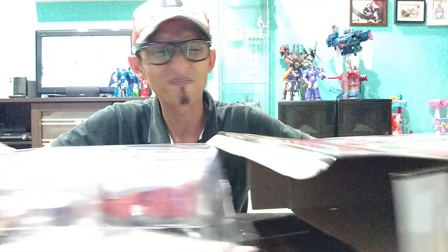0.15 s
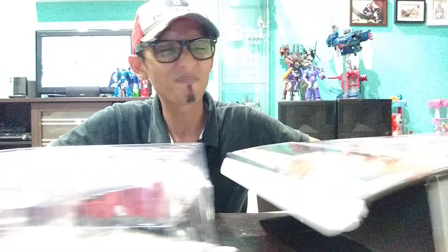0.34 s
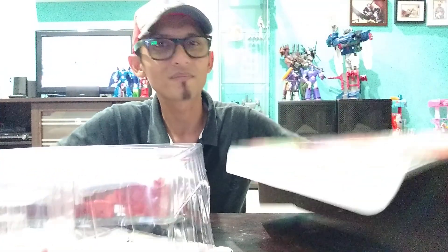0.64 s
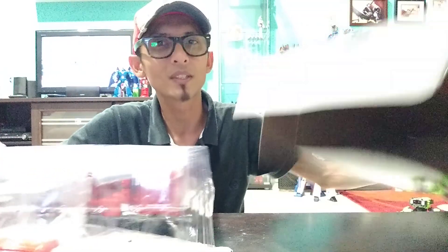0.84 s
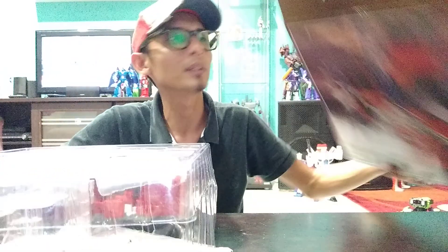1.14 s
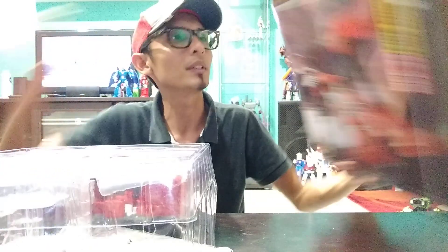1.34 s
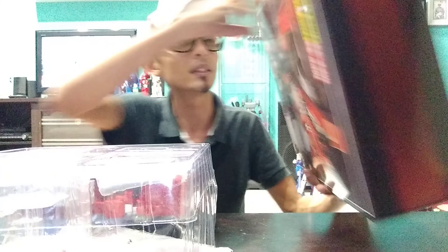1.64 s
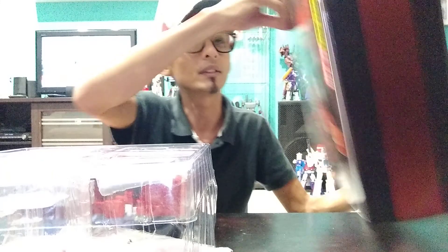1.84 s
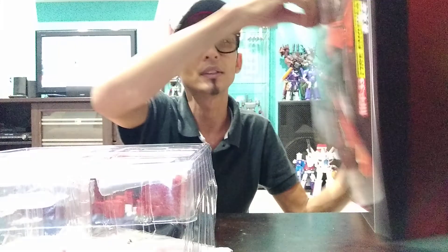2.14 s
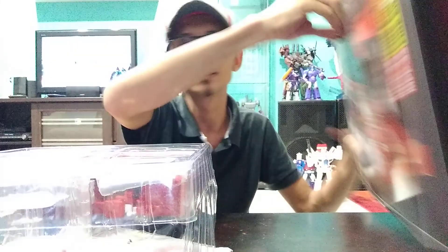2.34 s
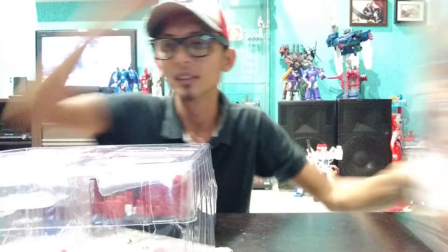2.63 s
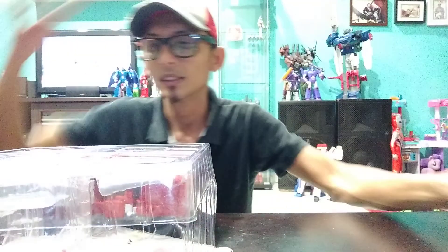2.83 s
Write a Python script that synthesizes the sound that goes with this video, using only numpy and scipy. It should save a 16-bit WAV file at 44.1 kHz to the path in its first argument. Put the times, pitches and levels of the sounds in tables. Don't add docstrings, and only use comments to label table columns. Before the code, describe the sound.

An empty cardboard box rubs off a plastic tray for the first 0.7 seconds, with creaks, hollow knocks, panel pops and flap scuffs. Handling bursts again around 0.9-1.3 seconds, then quieter pats at 1.75 and 1.9 and soft table bumps near 2.2. At 2.6 the box lands with the loudest, deep woody thud, followed by dragging. Close stereo, small room, faint hum.

```python
import sys
import numpy as np
from scipy import signal
from scipy.fft import rfft, irfft
from scipy.io import wavfile
from scipy.ndimage import uniform_filter1d

SR = 44100
rng = np.random.default_rng(int(sys.argv[2]) if len(sys.argv) > 2 else 0)


def digitize_waveform(pressure):
    field = np.atleast_2d(pressure).T
    bounded = np.clip(field, -1, 1)
    quanta = np.round(bounded * 32767).astype(np.int16)
    wavfile.write(sys.argv[1], SR, quanta)


def volts(x):
    e = np.asarray(x, float) / 20
    return 10 ** e


N = 132300

# time_s, level_db
TRAY_SLIDE = [
    (0, -65.5),
    (.3, -59),
    (.52, -67.5),
    (.56, -73),
    (.66, -65.5),
]
# pitch_hz, width_hz, level_db
TRAY_TONES = [(1100, 255, -1), (1579, 50, 2.5), (2065, 177, -0.5), (3890, 250, -9), (5340, 500, -33)]
# time_s, level_db
HAND_EFFORT = [(0, -50.5), (.7, -55.5), (.95, -57), (1.105, -89), (1.13, -37), (1.25, -53.5), (1.4, -65.5),
               (1.62, -67), (2.1, -61.5), (2.58, -57.5), (3.0, -54)]
# start_s, peak_db, pitch_hz, decay_to_60_db_s
PANEL_POPS = [(.036, -49, 1538, 0.065), (.185, -50, 1600, .06), (.211, -28.5, 1594, 0.049),
              (.363, -40, 1630, 0.045), (.379, -31, 1352, 0.039), (.478, -41, 2035, 0.13),
              (.495, -39, 1614, 0.071), (.531, -44, 1662, 0.075), (.541, -43, 2045, 0.054),
              (.604, -39.5, 908, 0.044), (.664, -51, 2480, .06), (.895, -40.5, 261, 0.12),
              (.94, -35, 2230, 0.046), (.941, -29, 349, 0.059), (.975, -46, 1310, .08),
              (1.113, -42.5, 1497, 0.081), (1.157, -44, 1880, .04), (1.213, -37, 2220, .04),
              (1.219, -44, 1530, 0.037), (1.25, -32, 206, 0.026), (1.274, -45, 340, 0.052),
              (1.298, -42, 299, .07), (1.325, -48.5, 1300, 0.17), (1.347, -41, 430, 0.099),
              (1.643, -46, 3700, .08), (1.652, -42.5, 3400, 0.084), (1.751, -27, 331, 0.092),
              (1.93, -39, 520, 0.071), (2.217, -49.5, 1055, 0.13), (2.219, -45.5, 465, 0.052),
              (2.291, -46, 520, 0.11), (2.428, -46.5, 2292, 0.046), (2.606, -18, 369, 0.16),
              (2.607, -23, 483, 0.13), (2.609, -28.5, 750, 0.12), (2.653, -22, 327.6, 0.082),
              (2.705, -42, 377, 0.09), (2.772, -44.5, 340, 0.085), (2.836, -39.5, 397, 0.094),
              (2.838, -41.5, 901, 0.085)]
# start_s, length_s, level_db, tilt_db_per_octave, lowest_hz
SCUFFS = [(.195, 0.035, -39.5, 5.5, 970), (0.355, 0.021, -46, 0.7, 1450), (0.405, 0.016, -49.5, 5, 1200),
          (0.474, 0.033, -45, 0.5, 920), (0.519, 0.038, -44.5, 2.5, 1010), (0.621, 0.021, -41.5, 9, 2370),
          (0.697, 0.024, -45, 4.5, 2000), (0.722, 0.045, -62.5, -4, 8800), (0.826, 0.057, -55, 9.5, 2530),
          (0.867, 0.043, -57.5, 2.5, 2300), (0.932, 0.03, -34.5, -2, 577), (0.954, 0.02, -47, 1.5, 600),
          (1.022, 0.021, -52.5, -0.5, 3540), (1.101, 0.054, -41, 3.5, 1100), (1.13, 0.1, -38, 0.5, 500),
          (1.206, 0.037, -38.5, -3, 504), (1.315, 0.062, -64.5, -10, 1100), (1.636, 0.058, -51, 0, 3300),
          (1.641, 0.045, -57, -1, 11000), (1.746, 0.034, -61.5, 3.2, 9000),
          (2.191, 0.074, -50.5, 3.1, 3530), (2.206, 0.058, -52, 3, 1920), (2.418, 0.033, -58, 3, 1940),
          (2.424, 0.017, -57.5, 15, 10900), (2.468, 0.065, -61.5, 5, 9000),
          (2.596, 0.036, -42.5, -1.5, 700)]
# pitch_hz, level_db
CARD_COLOUR = [(410, 14), (700, -2.5), (1570, -4.5), (3130, -20.5), (4160, -15), (4740, -19.5), (6480, -20),
               (8860, -35.5), (15700, -26)]
# start_s, peak_db, loudest_pitch_hz, slap_db (against the peak), upper_reach_octaves
KNOCKS = [(.206, -36.5, 454, 0.5, 1.2), (0.224, -33, 300, -10, 0.47), (0.38, -22, 576, -24, 0.97),
          (0.391, -23, 226, -43, 0.51), (0.474, -27.5, 500, -24, 0.67), (.600, -31.5, 530, -11, 4),
          (0.662, -32, 215, -12.5, 0.72), (.937, -26.5, 616, 8.5, 8.1), (1.056, -35, 430, -24, 0.17),
          (1.12, -29, 250, -6, 0.28), (1.149, -20.5, 250, -10.5, 1.5), (1.186, -27.5, 300, 2.5, 2.5),
          (1.228, -32, 616, 0.5, 0.54)]
PATS = [
    (1.670, -41.5, 300, -28, 0.45),
    (1.747, -23.5, 417, -20, 0.48),
    (1.887, -27, 455, -18.5, 0.37),
    (1.961, -39.5, 503, -17, 0.49),
    (2.001, -42.5, 610, -8, 1.2),
    (2.429, -40.5, 500, -17.5, 1.1),
    (2.472, -34.5, 460, -14, 0.19),
    (2.494, -33.5, 494, -14, 0.19),
    (2.602, -16, 292, -20.5, 0.73),
    (2.841, -42, 860, 5, 1.7),
]
# pitch_hz, level_db
WALL_TONES = [(172, -6.5), (215, -1.6), (250, -2.5), (300, 0.6), (345, -2), (375, -3.5), (435, -3),
              (500, 0.8), (590, 0), (720, 1.5), (830, -15.5), (960, -5.5), (1250, 6), (1600, -25)]
# start_s, peak_db, pitch_hz, ring_length_share
THUDS = [(0.334, -35.5, 158, 0.9), (0.379, -27, 101, 1), (0.612, -38.5, 151, 0.95),
         (0.86, -45.5, 175, 0.59), (1.082, -38.5, 153, 0.46), (1.11, -27.5, 120, 0.25),
         (1.187, -31, 116.6, 0.67), (1.766, -26.5, 174.8, 0.44), (1.882, -34, 119, 0.82),
         (1.968, -34.5, 193, 0.36), (1.991, -35, 124.6, 0.45), (2.131, -46, 104, 1),
         (2.213, -23.5, 106.9, 0.69), (2.249, -24, 109.5, 0.41), (2.427, -33.5, 149, 0.58),
         (2.486, -29, 134, 0.16), (2.598, -3, 136.6, 0.32), (2.621, -18, 118, 0.19),
         (2.646, -12, 146.2, 0.35), (2.688, -16.5, 133, 0.37), (2.739, -24, 125.4, 0.3),
         (2.779, -30.5, 163, 0.27), (2.824, -35.5, 110, .5), (2.293, -33, 121.8, 0.42),
         (2.341, -34, 106, 0.38), (2.924, -38, 98, 0.19)]
# pitch_ratio, level_db, decay_to_60_db_s, port_phase_rad
TABLE_TONES = [(.93, -1, 0.34, 0.78), (1.08, 0, 0.47, 0.3), (0.96, -5, 0.22, 0.61)]
# time_s, level_db
TABLE_DRAG = [
    (2.63, -63),
    (2.7, -49.5),
    (2.77, -46),
    (2.88, -49.5),
    (3.0, -51),
]
# pitch_hz, level_db
DRAG_COLOUR = [(710, -47.5), (1200, -16), (2010, -11.5), (2750, 0), (6930, -5), (8500, -15), (13900, -2.5),
               (15700, -0.5)]
# pitch_hz, level_db
HUM_COLOUR = [(24, -47), (40, -6.5), (198, -2), (625, -16.5), (865, -22), (1880, -19.5), (8200, -35.5),
              (15700, -31)]
# pitch_hz, level_db
PORT_TREBLE = [(20, 1), (4000, -2), (16500, 3.5)]

KNOCK_PAN_DB = -0.6


def table(rows):
    return np.array(rows, float).T


def unit(x):
    return x / np.sqrt(np.mean(x ** 2) + 1e-30)


def curve(rows):
    s, db = table(rows)
    return volts(np.interp(np.arange(N) / SR, s, db, left=-120, right=-120))


def colour(x, points, tilt_db=0.):
    n = x.shape[-1]
    hz, db = table(points)
    f = np.maximum(np.arange(n // 2 + 1) * SR / n, 1.)
    gain_db = np.interp(np.log(f), np.log(hz), db, left=-90, right=-90)
    return irfft(rfft(x) * volts(gain_db + tilt_db * np.log2(f / 4000)), n)


def ring(hz, gain, t60, length_s, twist=0.):
    t = np.arange(int(length_s * SR)) / SR
    tones = np.exp(np.outer(2j * np.pi * hz - np.log(1000) / np.abs(t60), t))
    left = (gain * np.exp(.5j * twist)) @ tones
    right = (gain * np.exp(-.5j * twist)) @ tones
    return np.array([left.imag, right.imag])


def push(ms):
    p = np.hanning(max(int(abs(ms) * SR / 1000), 1) + 2)
    return p / p.sum()


def add(out, x, s, pan_db):
    right_lag_s = 0.00019
    for ch, (lag, g) in enumerate(((0, pan_db / 2), (right_lag_s, -pan_db / 2))):
        i = int((s + lag) * SR)
        out[ch, i:i + x.shape[1]] += volts(g) * x[ch, :N - i]


def grit(size, spread_db):
    mid, side = rng.standard_normal((2, size)) * volts(spread_db * rng.exponential(size=size))
    return mid + 0.75 * side * np.array([[1], [-1]])


def shaken(events, level_db, fade_s):
    t = np.arange(N) / SR
    total = 0
    for s, peak_db, *_ in events:
        total = total + volts(peak_db + level_db) * (t > s) * np.exp(-np.abs(t - s) / fade_s)
    return total


def walls():
    hz, db = table(WALL_TONES)
    return hz, db, 0.098 * (hz / 300) ** -0.81


def patchy(x):
    ripple_db, ripple_hz = 4.5, 250
    f = np.arange(x.shape[1] // 2 + 1) * SR / x.shape[1]
    bumps = rng.standard_normal(200)
    gain_db = ripple_db * np.interp(f / ripple_hz, np.arange(len(bumps)), bumps)
    return irfft(rfft(x) * volts(gain_db), x.shape[1])


def wander():
    drift_db, drift_s = 3.5, 0.033
    return volts(drift_db * unit(uniform_filter1d(rng.standard_normal(N), int(drift_s * SR))))


def sliding():
    rub = grit(N, 2.45)
    tray = 0
    for hz, width_hz, db in TRAY_TONES:
        tone = signal.lfilter(*signal.iirpeak(hz, hz / width_hz, SR), rub)
        tray = tray + volts(db) * wander() * unit(tone)
    on_tray = [k for k in KNOCKS if k[0] < TRAY_SLIDE[-1][0]]
    jolts = shaken(on_tray, -30.5, 0.004)
    drag = 0
    for tilt_db in (-1.4, 1.4):
        drag = drag + np.sqrt(wander()) * colour(grit(N, 1.7), DRAG_COLOUR, tilt_db)
    return (curve(TRAY_SLIDE) + jolts) * tray + curve(TABLE_DRAG) * unit(drag)


def handling():
    creaks_per_s, creak_spread_db = 500, 4.5
    hz, db, t60 = walls()
    out = 0
    effort = curve(HAND_EFFORT) + shaken(KNOCKS + PATS, -14.5, 0.026)
    for k in range(0, len(hz), 2):
        pair = slice(k, k + 2)
        sizes = np.clip(unit(grit(N, creak_spread_db)), -2.2, 2.2)
        creaks = (rng.random(N) < creaks_per_s / SR) * sizes
        body = ring(hz[pair], volts(db[pair] - 0.0096 * hz[pair]), 0.43 * t60[pair], .2)
        out = out + signal.fftconvolve(creaks * effort, body, axes=1)[:, :N]
    return out * np.sqrt(np.mean(effort ** 2) / np.mean(out ** 2))


def pops():
    spread, rise_s, twist_rad = 0.035, 0.0049, 1.28
    out = np.zeros((2, N))
    t = np.arange(int(.2 * SR)) / SR
    for s, peak_db, tone_hz, t60 in PANEL_POPS:
        c = rng.standard_normal(4)
        hz = tone_hz * (1 + spread * (np.arange(-1, 2) + 0.36 * c[:3]))
        x = ring(hz, np.array([.6, 1, .6]), t60, len(t) / SR + 1e-6, twist_rad * c[3])
        x = x[:, :len(t)] * np.minimum(t / rise_s, 1)
        add(out, volts(peak_db) * x / np.abs(x).max(), s, KNOCK_PAN_DB)
    return out


def scuffs():
    rise_share, fall_share, tail_s = 0.25, 0.47, 0.023
    out = np.zeros((2, N))
    t = np.arange(8192) / SR
    for s, length, db, tilt_db, low_hz in SCUFFS:
        u = t / length
        stroke = np.clip(np.minimum(u / rise_share, (1 - u) / fall_share), 0, 1) ** 0.98
        tail = 0.034 * np.minimum(u, 1) * np.exp(-np.maximum(t - length, 0) / tail_s)
        x = colour(grit(len(t), 2.5), CARD_COLOUR, tilt_db)
        x = signal.sosfilt(signal.butter(4, low_hz, "high", fs=SR, output="sos"), x)
        add(out, volts(db) * (stroke + tail) * unit(patchy(x)), s, 2.5 + 0.25 * tilt_db)
    return out


def knocks():
    low_reach_octaves, scatter_db, contact_ms, slap_fade_s = 0.92, 3, 1.4, 0.0065
    slap_colour = [(900, -17), (1600, 1.0), (4200, -3.0), (7000, -15.5)]  # pitch_hz, level_db
    out = np.zeros((2, N))
    hz, db, t60 = walls()
    signs = (-1) ** np.arange(len(hz))
    for s, peak_db, tone_hz, slap_db, reach in KNOCKS + PATS:
        c = rng.standard_normal((2, len(hz)))
        off = np.log2(hz / tone_hz)
        loss_db = 11.1 * np.abs(off / np.where(off > 0, reach, low_reach_octaves)) ** 0.49
        gain = volts(db + scatter_db * c[0] - loss_db)
        x = ring(hz * (1 + 0.021 * c[1]), gain * signs, t60, 0.31, 0.068)
        x = signal.fftconvolve(x, push(contact_ms)[None])
        n = np.arange(x.shape[1])
        tilt_db = -4.5 * (s >= PATS[0][0])
        slap = colour(grit(len(n), 1.7), slap_colour, tilt_db) * np.exp(-n / SR / slap_fade_s)
        x = x / np.abs(x).max() + volts(slap_db) * slap / np.abs(slap).max()
        add(out, volts(peak_db) * x, s, KNOCK_PAN_DB)
    return out


def thuds():
    stand_hz, stand_db, stand_t60_s, contact_ms = 54.9, -30, 0.98, 3.62
    out = np.zeros((2, N))
    ratio, db, t60, twist = table(TABLE_TONES)
    for s, peak_db, tone_hz, share in THUDS:
        top = ring(ratio * tone_hz, volts(db), t60 * share, .4, twist)
        stand = ring(np.array([stand_hz]), volts(np.array([stand_db])), stand_t60_s * share ** .3, .4)
        x = signal.fftconvolve(top + stand, push(contact_ms)[None])
        add(out, -volts(peak_db) * x / np.abs(x).max(), s, -.3)
    return out


def room(x):
    t60_s, treble_t60_s, rise_s, level_db = 0.34, 0.24, 0.014, -11
    t = np.arange(int(.6 * SR)) / SR
    noise = rng.standard_normal((2, len(t)))
    noise = noise + 1.46 * noise[::-1]
    low = signal.lfilter(*signal.butter(1, 1500, fs=SR), noise)
    tail = low * np.exp(-np.log(1000) * t / t60_s)
    tail = tail + (noise - low) * np.exp(-np.log(1000) * t / treble_t60_s)
    tail = tail * np.minimum(t / rise_s, 1)
    tail = tail / np.sqrt((tail ** 2).sum(axis=1, keepdims=True)) * volts(level_db)
    return signal.fftconvolve(x, tail, axes=1)[:, :N]


def hum():
    return volts(-58.5) * unit(colour(grit(N, 0.44), HUM_COLOUR))


def scene():
    near = sliding() + handling() + pops() + scuffs() + knocks() + thuds()
    return near + room(near) + hum()


def band_limit(x):
    return signal.sosfilt(signal.butter(12, 16600, fs=SR, output="sos"), x)


def record(dry):
    hz, db = table(PORT_TREBLE)
    left = colour(dry[0], np.c_[hz, db / 2])
    right = colour(dry[1], np.c_[hz, -db / 2])
    bass_cut = signal.butter(7, 50, "high", fs=SR, output="sos")
    mix = signal.sosfilt(bass_cut, np.array([left, right]))
    return band_limit(mix)


dry = scene()
out = record(dry)
digitize_waveform(out)
```